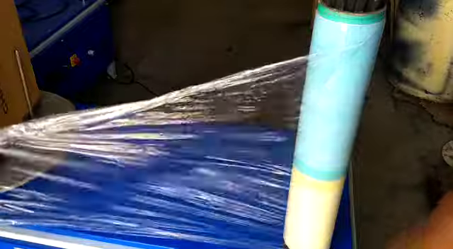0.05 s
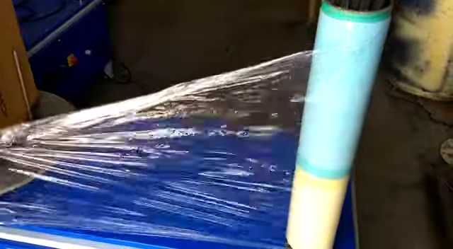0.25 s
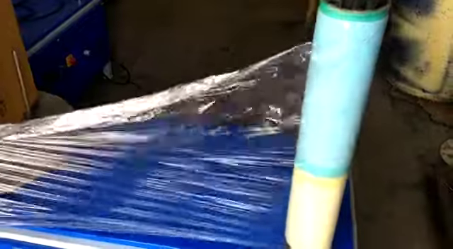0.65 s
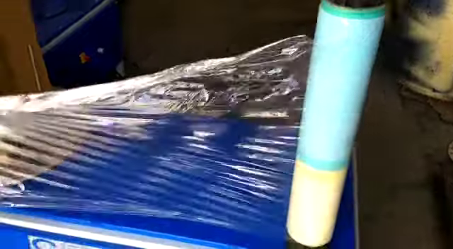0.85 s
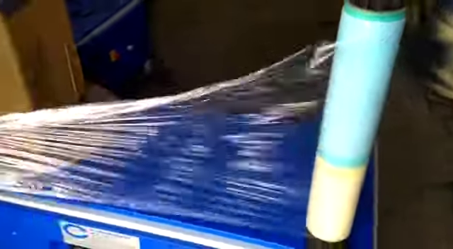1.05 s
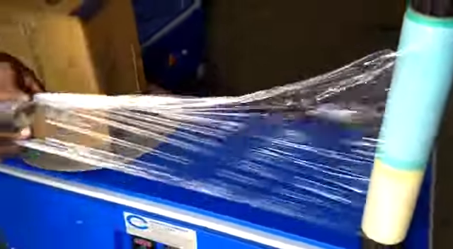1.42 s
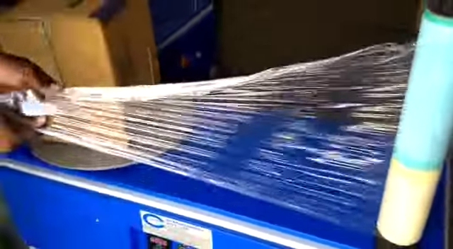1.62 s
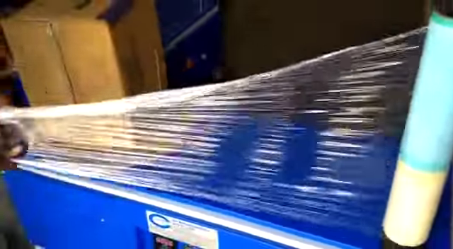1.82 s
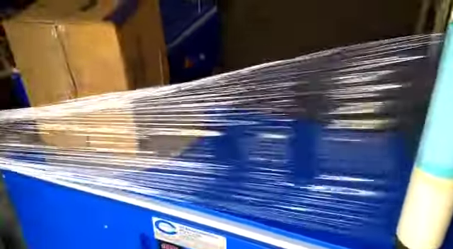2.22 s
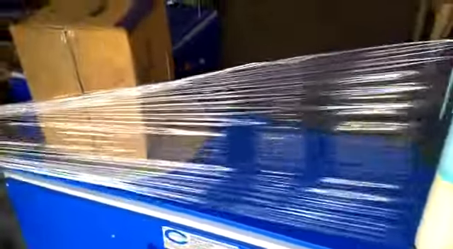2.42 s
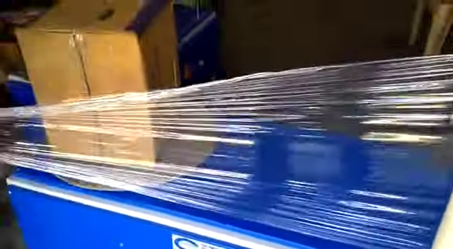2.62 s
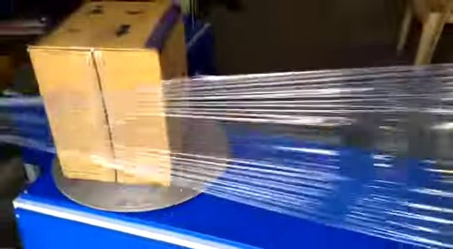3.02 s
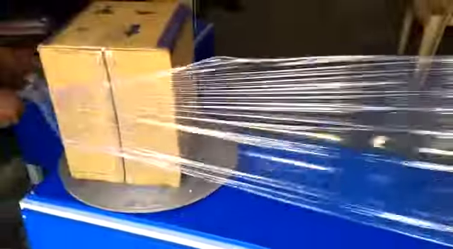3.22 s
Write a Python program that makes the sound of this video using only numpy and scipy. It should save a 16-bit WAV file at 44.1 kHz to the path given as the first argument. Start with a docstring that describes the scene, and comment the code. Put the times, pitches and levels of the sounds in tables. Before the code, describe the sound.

Close to the microphone, plastic wrap crackles and its hollow roll knocks and rings on a spindle. The film snaps once, then unwinds in two long hisses, with a wrapping machine humming low in the workshop.

```python
"""Stretch film off the roll

Film is drawn off a hand-held roll beside a whirring wrapping machine in a workshop. The slack film
rustles and crackles as it tightens; the roll knocks, rumbles and rings on its spindle. A pleat snaps
free, then the film peels away in two long hissing pulls. Two close mic ports are widened to stereo."""
import sys
import numpy as np
from scipy import signal
from scipy.fft import rfft, irfft, next_fast_len
from scipy.io import wavfile

SR = 44100
rng = np.random.default_rng(int(sys.argv[2]) if len(sys.argv) > 2 else 0)


def master(y):
    """Save y as 16-bit WAV."""
    cut = np.clip(np.atleast_2d(y).T, -1, 1)
    pcm = np.round(cut * 32767)  # scale
    wavfile.write(sys.argv[1], SR, pcm.astype(np.int16))


N = 147735
FFT_SIZE = next_fast_len(N + 4096)
TIME, FREQ = np.arange(N) / SR, np.fft.rfftfreq(FFT_SIZE, 1 / SR)


def from_db(db):
    """Decibels to gain."""
    return 10 ** (np.asarray(db) / 20)


def fader(rows):
    """Gain over time from (t/s, level/dB) points."""
    return from_db(np.interp(TIME, *np.transpose(rows)))


def curve(rows):
    """Joins (f/Hz, value) points along a log-frequency axis."""
    hz, value = np.transpose(rows)
    return np.interp(np.log(FREQ + 1), np.log(hz), value)


def bell(hz, width, axis=FREQ):
    """A peak of height 1 at hz, down to half at width Hz to either side."""
    return 1 / (1 + ((axis - hz) / width) ** 2)


def filtered(x, response):
    """Applies a frequency response."""
    return irfft(rfft(x, FFT_SIZE) * response, FFT_SIZE)[..., :N]


def cut(x, hz, kind):
    """Second-order low- or high-pass."""
    return signal.sosfilt(signal.butter(2, hz, kind, fs=SR, output="sos"), x + 1e-18)


def drift(rate_hz):
    """Random wander with a spread of 1."""
    slow = filtered(rng.standard_normal(N), bell(0, rate_hz))
    return slow / slow.std()


# How alike the two mic ports sound: f/Hz, correlation
PORT_LIKENESS = [(60, 0.74), (250, 0.67), (500, 0.9), (1000, 0.46), (1700, 0.0067)]
def diffuse(gain):
    """Noise with this gain per root Hz at both ports, alike in the lows and wide on top."""
    alike = curve(PORT_LIKENESS)
    response = gain * np.sqrt([1 + alike, 1 - alike]) * np.sqrt(SR) / 2
    mid, side = filtered(rng.standard_normal((2, N)), response)
    return np.array([mid + side, mid - side])


def resonances(modes, steadiness=0.65):
    """Narrow modes kept ringing by noise, their swells partly evened out."""
    out = 0
    for hz, width, db, *_ in modes:
        tone = diffuse(bell(hz, width))
        envelopes = np.abs(signal.hilbert(tone, FFT_SIZE)[:, :N])
        swell = np.sqrt(np.mean(envelopes ** 2, axis=0))
        tone /= swell ** steadiness
        out = out + from_db(db) * tone / tone.std()
    return out


# Fader ride of the machine's whirr: t/s, level/dB
WHIRR_RIDE = [(.07, -20), (.14, -7.5), (.3, -0.5), (.6, 0), (1.05, 1), (1.2, 1), (1.6, 2), (1.8, 6),
              (2.05, 0), (2.28, 0), (2.48, 0.5), (2.8, 2.5), (3.05, -4), (3.35, -2)]
# Whirr EQ: f/Hz, level/dB
WHIRR_EQ = [(25, -99), (45, -88), (75, -68.5), (105, -78), (170, -71), (400, -69.5), (475, -60.5),
            (560, -62), (650, -63), (800, -66), (1150, -70), (1600, -67), (2400, -68), (4500, -80),
            (7500, -83), (9300, -86), (11500, -105), (16000, -113)]
# Motor hum tones: f/Hz, width/Hz, level/dB
HUM_TONES = [(146, 14, -51.5), (470.8, 6.7, -46)]
# Fader ride of the hum: t/s, level/dB
HUM_RIDE = [(.07, -15), (.2, 3.5), (1.1, 5), (1.7, -0.5), (2.1, -4.5), (2.75, 3), (3.0, -14), (3.35, -14)]
def machine():
    """The bed: the wrapping machine whirrs over the low hum of its motor."""
    whirr = fader(WHIRR_RIDE) * diffuse(from_db(curve(WHIRR_EQ)))
    hum = fader(HUM_RIDE) * resonances(HUM_TONES)
    return whirr + hum


def tick_envelopes(strengths, decay_s=.0002):
    """Each tick has an instant attack and a tiny tail."""
    return signal.lfilter([1], [1, -np.exp(-1 / (decay_s * SR))], strengths + 1e-18)


# Fader ride of the rustling film: t/s, level/dB
RUSTLE_RIDE = [(.07, -7.5), (.17, -9.5), (.22, 2.5), (.29, -3.5), (.35, 6.5), (.42, 9.5), (.46, -1),
               (.7, 1), (.8, 3), (.9, 2.5), (1.02, 5), (1.3, -2.5), (1.38, 5), (1.45, -2.5), (1.7, 2),
               (2.5, -15), (2.8, 0.5), (3.3, -10.5)]
# Rustle EQ: f/Hz, level/dB
RUSTLE_EQ = [(400, -103), (1800, -81), (3500, -75.5), (5000, -80.5), (9200, -79.5), (11500, -86.5),
             (16000, -92)]
def rustle(ticks_per_s=370, tick_db=-32.5, tick_spread_db=2, flutter_db=2.56):
    """The film shifts under tension: a soft, uneven hiss sprinkled with ticks."""
    sizes = from_db(tick_db + tick_spread_db * np.minimum(rng.exponential(1, N), 4))
    triggers = rng.random(N) < ticks_per_s / SR
    ticks = tick_envelopes(sizes * triggers) * rng.standard_normal((2, N))
    ticks = cut(cut(ticks, 3400, "high"), 8400, "low")
    hiss = diffuse(from_db(curve(RUSTLE_EQ))) * from_db(flutter_db * drift(44))
    return fader(RUSTLE_RIDE) * (hiss + ticks)


# Crease hits, levels before trim: t/s, level/dB, treble shelf/dB, ring f/Hz, decay/s
CREASE_HITS = [(0.1094, -20.5, -15, 7610, 0.0018), (0.1388, -26, -8, 3330, 0.002),
               (0.186, -28, -14, 3700, .002), (0.2008, -16, -23, 6130, 0.0022),
               (0.2185, -21, -20, 3680, 0.002), (.2265, -21.5, -16, 6000, .002),
               (.2564, -24, -22, 3600, .002), (0.2783, -17, -21, 3440, 0.002),
               (0.3103, -11, -26, 3700, 0.0023), (0.321, -18, -21, 8000, 0.0018),
               (0.3412, -18, -23, 3060, 0.003), (0.349, -23, -19, 3810, 0.002),
               (0.363, -10, -11, 3170, 0.0022), (0.3675, -20, -11, 3500, .0016),
               (0.4931, -6, -15, 3780, 0.00094), (0.5, -9.5, -18, 4100, 0.0024),
               (.5155, -20, -17, 8000, .0016), (.5497, -25, -20, 5800, .0016),
               (0.5716, -21, -16, 3710, 0.0016), (0.592, -15, -18, 3060, 0.002),
               (0.6107, -19, -12, 3700, 0.0018), (0.6866, -9.5, -16, 8000, 0.0018),
               (0.7758, -16, -23, 4150, 0.0018), (0.7827, -12.5, -16, 7800, 0.0019),
               (.789, -16, -20, 3700, .0018), (0.7955, -9, -22, 3800, 0.0025),
               (0.8377, -11.5, -28, 3510, 0.0018), (0.9533, -16, -26, 3380, 0.002),
               (1.4004, -12, -17, 3940, 0.0026), (1.4901, -17.5, -15, 3370, 0.002)]
def crackles(trim_db=-0.5, treble_trim_db=10, ring_db=8, grit_db=2.5, attack_s=.00023):
    """Each crease buckles in a sharp, gritty burst; finer wrinkles give way just before and after."""
    wrinkles_per_s, wrinkle_spread_s, wrinkle_db = 600, .007, -12
    length, lead_s = 2048, .015
    offset = TIME[:length] - lead_s
    age, hz = np.maximum(offset, 0), np.fft.rfftfreq(length, 1 / SR)
    shelf = 1 - 1 / (1 + (hz / 9500) ** 4)
    out = np.zeros((2, N))
    for onset, db, treble_db, ring_hz, decay_s in CREASE_HITS:
        burst = (1 - np.exp(-(age / attack_s) ** 2)) * np.exp(-age / decay_s)
        triggers = rng.random(length) < wrinkles_per_s / SR
        wrinkles = tick_envelopes(triggers) * np.exp(-np.abs(offset) / wrinkle_spread_s)
        envelope = burst + from_db(wrinkle_db) * wrinkles
        grit = rng.standard_normal((2, length)) * from_db(grit_db * (rng.standard_normal(length) - 1))
        eq_db = ring_db * bell(ring_hz, 340, hz) + (treble_db + treble_trim_db) * shelf
        start = int((onset - lead_s) * SR)
        out[:, start:start + length] += envelope * irfft(rfft(grit) * from_db(db + trim_db + eq_db))
    return cut(cut(out, 3400, "high"), 12900, "low")


def workshop(x, t60_s=0.036, wet_db=-9, build_s=0.0014):
    """The room scatters back a short tail, different at each port."""
    tail = rng.standard_normal((2, N)) * from_db(-60 * TIME / t60_s) * (1 - np.exp(-TIME / build_s))
    tail /= np.sqrt(np.sum(tail ** 2) / 2)
    return x + from_db(wet_db) * signal.fftconvolve(x, tail, axes=1)[:, :N]


# Fader ride of the turning roll: t/s, level/dB
RUMBLE_RIDE = [(.1, -31.5), (.31, -29), (.36, -6), (.405, -4.5), (.48, -3), (.53, -8.5), (.66, -6),
               (.76, -12.5), (.88, -10.5), (1.07, -16.5), (1.2, -37), (1.8, -24.5), (2.13, -26),
               (2.25, -10), (2.4, -16), (2.58, -20.5), (2.95, -34), (3.3, -28)]
# Rumble EQ: f/Hz, level/dB
RUMBLE_EQ = [(30, -76), (70, -57.5), (105, -55), (145, -46.5), (195, -44.5), (255, -46), (330, -48.5),
             (420, -50.5), (620, -49.5), (900, -59.5), (1600, -66), (3000, -68), (8000, -100)]
def rumble():
    """The low end: the hollow roll rumbles as it turns."""
    return fader(RUMBLE_RIDE) * diffuse(from_db(curve(RUMBLE_EQ)))


# Hollow modes of the cardboard core: f/Hz, width/Hz, rubbed level/dB, knocked level/dB
CORE_MODES = [(140, 12, -33, -31), (185, 75, -44, -17), (239, 12, -23, -23), (580, 55, -34, -23),
              (716, 14, -29, -27), (850, 70, -36, -23)]
# Knocks as the film takes up: t/s, level/dB
KNOCK_HITS = [(.366, -11), (.3995, 1), (.4204, 0), (.4497, -3), (.4935, -5), (.675, -10)]
def core(jolt_s=0.425, rise_db_per_s=240, fall_db_per_s=75, low_cut_hz=115):
    """The core knocks on its spindle, never quite alike, and rings as the roll jolts into motion."""
    knocks = np.zeros(N)
    for onset, db in KNOCK_HITS:
        age = np.clip(TIME - onset, 0, 1)
        for hz, width, _, mode_db in CORE_MODES:
            gain = from_db(db + mode_db + rng.standard_normal())
            knocks += gain * np.exp(-np.pi * width * age) * np.sin(2 * np.pi * hz * age)
    knocks = cut(cut(knocks, low_cut_hz, "high"), low_cut_hz, "high")
    since_jolt = TIME - jolt_s
    jolt = from_db(np.minimum(rise_db_per_s * since_jolt, -fall_db_per_s * since_jolt))
    return knocks + jolt * resonances(CORE_MODES)


# Ringing modes of the spindle: f/Hz, width/Hz, level/dB
SPINDLE_MODES = [(1196, 14, -40), (1409, 9, -31.5), (1470, 15, -34), (3370, 20, -48)]
# Fader ride of the ring: t/s, level/dB
RING_RIDE = [(.3, -24), (.43, .5), (.62, -5.5), (.9, -7), (1.15, -22), (2.17, -20), (2.25, -3.5),
             (2.37, -7), (2.46, -14.5), (3.3, -19.5)]
# Thin squeal on top: f/Hz, width/Hz, level/dB
SQUEAL_TONE = [(4137, 3, -39)]
# Fader ride of the squeal: t/s, level/dB
SQUEAL_RIDE = [(.3, -30), (.4, -7), (.5, -2), (.63, -9), (.75, 1), (.82, -7), (.88, -2), (1.05, -14),
               (1.2, -35)]
def spindle():
    """The roll rubs on its spindle and sets it ringing and squealing."""
    ring = fader(RING_RIDE) * resonances(SPINDLE_MODES)
    squeal = fader(SQUEAL_RIDE) * resonances(SQUEAL_TONE)
    return ring + squeal


# Ring of the snapping pleat: f/Hz, level/dB, t60/s
PLEAT_MODES = [(1100, -15, .004), (4200, -13, .004), (5600, -9, .0045), (7500, -6.5, .004),
               (10800, -14, .0025), (15000, -19, .002)]
def snap(onset_s=1.0659, right_lag_s=.00006, crack_db=-17, crack_decay_s=.00064):
    """A taut pleat lets go with a crack, a brief ring and a chirp, a touch later on the right."""
    age = np.maximum(TIME - onset_s - np.array([[0], [right_lag_s]]), 0)
    crack_envelope = (age > 0) * np.exp(-np.minimum(age / crack_decay_s, 20))
    out = from_db(crack_db) * rng.standard_normal((2, N)) * crack_envelope
    for hz, db, t60 in PLEAT_MODES:
        out += from_db(db - 60 * np.minimum(age / t60, 10)) * np.sin(2 * np.pi * hz * age)
    # The jolt runs along the film and returns as a falling chirp.
    return_s, attack_s, decay_s, chirp_db = .0039, .0001, .001, -7.5
    start_hz, end_hz, fall_s = 6800, 3000, .0016
    chirp_age = np.maximum(age - return_s, 0)
    cycles = end_hz * chirp_age + (start_hz - end_hz) * fall_s * (1 - np.exp(-chirp_age / fall_s))
    chirp_envelope = np.tanh(chirp_age / attack_s) * np.exp(-np.minimum(chirp_age / decay_s, 20))
    out += from_db(chirp_db) * chirp_envelope * np.sin(2 * np.pi * cycles)
    return cut(out, 440, "high")


# Fader ride of the two pulls: t/s, level/dB
PEEL_RIDE = [(1.66, -46), (1.73, -13.5), (1.77, -4.5), (1.86, -1), (1.98, -6), (2.05, -0.5), (2.11, -5),
             (2.22, -1), (2.34, -2.5), (2.44, -7.5), (2.52, -25), (2.765, -57), (2.79, -2.5), (2.88, -3),
             (2.97, -1.5), (3.04, -4.5), (3.11, -25.5), (3.2, -50)]
# EQ of the hiss at the peeling line: f/Hz, level/dB
PEEL_EQ = [(150, -92), (450, -77), (900, -63), (1800, -70), (3000, -64.5), (7500, -63), (13000, -62),
           (16000, -65)]
# Faint resonances of the drawn film: f/Hz, width/Hz, first pull level/dB, second pull level/dB
FILM_RESONANCES = [(2900, 600, 2.5, -1), (5900, 600, -1, 4), (7800, 1000, 0, 1), (13200, 500, 1.2, 0)]
def peel(second_pull_s=2.65, rough_db=0.2, grain_db=0.6):
    """Countless tiny bonds let go along the peeling line: a grainy hiss, tinted anew for each pull."""
    grain = from_db(rough_db * drift(130) + grain_db * drift(3000))
    grain /= np.sqrt(np.mean(grain ** 2))
    tints_db = sum(np.outer(pull_dbs, bell(hz, width)) for hz, width, *pull_dbs in FILM_RESONANCES)
    first_eq, second_eq = from_db(curve(PEEL_EQ) + tints_db)
    hiss = np.where(TIME < second_pull_s, diffuse(first_eq), diffuse(second_eq))
    return fader(PEEL_RIDE) * hiss * grain


def scene():
    """The mix at the two ports; only the crackles get the room."""
    return machine() + rustle() + workshop(crackles()) + rumble() + core() + spindle() + snap() + peel()


# Stereo widener: f/Hz, share of the opposite port to subtract (capped at max_share)
WIDENER_SHARE = [(250, 0.12), (1000, 0.78), (2400, 1), (5000, 1), (9000, 0.28), (15000, 0.68)]
def record(dry, max_share=.88, lag_s=.000426, port_tilt_db=1.0, output_tilt_db=0.45):
    """Each channel subtracts the delayed opposite port for width, then a fade-in and a steep top cut."""
    start_s, fade_s, top_hz = 0.065, 0.013, 15500
    ports = dry * from_db([[port_tilt_db], [-port_tilt_db]])
    share = np.clip(curve(WIDENER_SHARE), 0, max_share)
    opposite = filtered(ports[::-1], share * np.exp(-2j * np.pi * FREQ * lag_s))
    wide = filtered(ports - opposite, 1 / np.sqrt(1 + share ** 2))
    wide *= from_db([[-output_tilt_db], [output_tilt_db]])
    wide *= np.clip((TIME - start_s) / fade_s, 0, 1)
    return signal.sosfilt(signal.ellip(12, .1, 80, top_hz, fs=SR, output="sos"), wide)


dry = scene()
out = record(dry)
master(out)
```